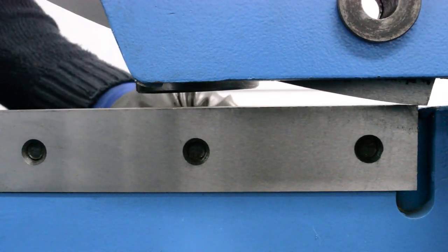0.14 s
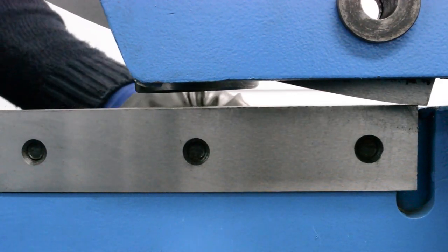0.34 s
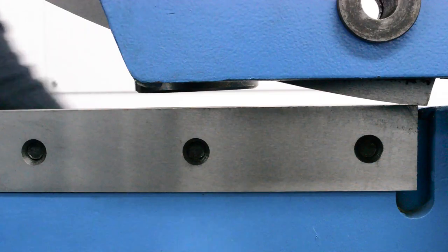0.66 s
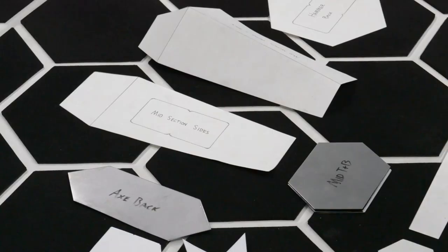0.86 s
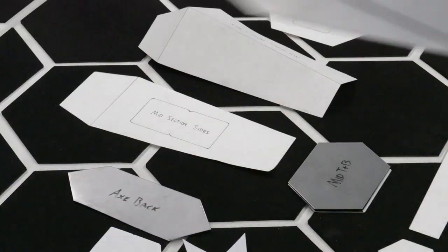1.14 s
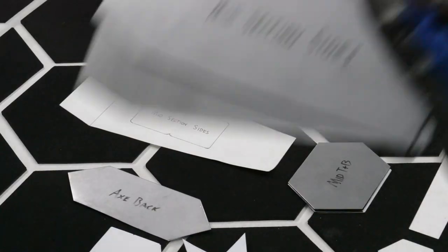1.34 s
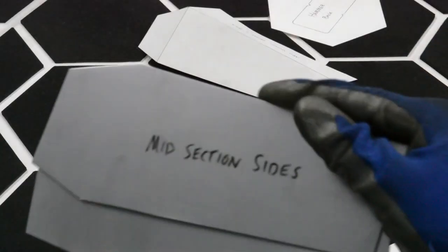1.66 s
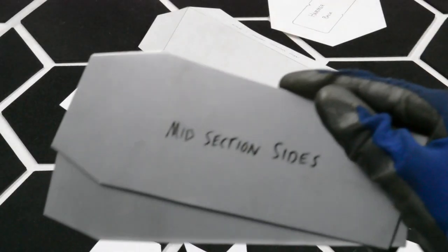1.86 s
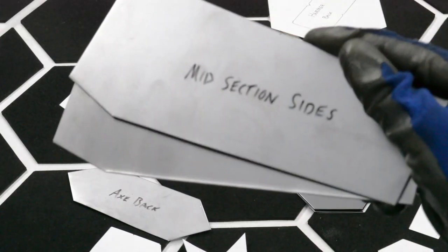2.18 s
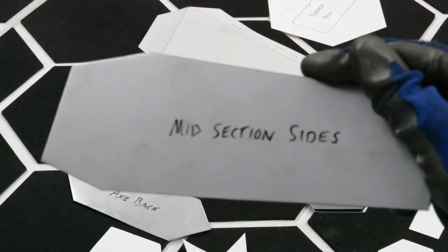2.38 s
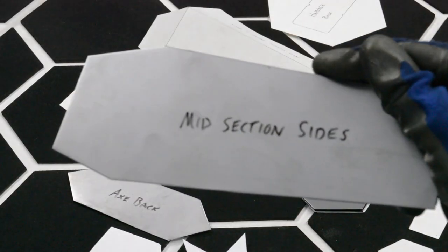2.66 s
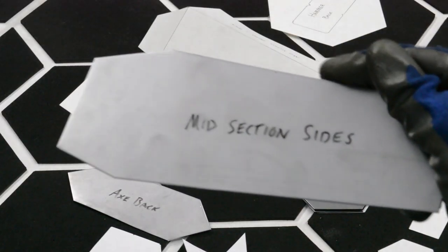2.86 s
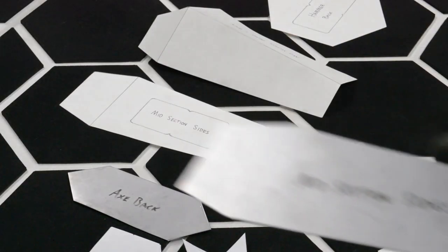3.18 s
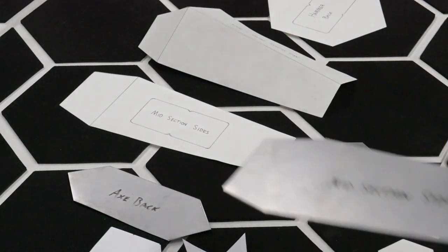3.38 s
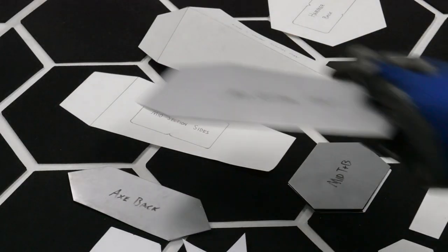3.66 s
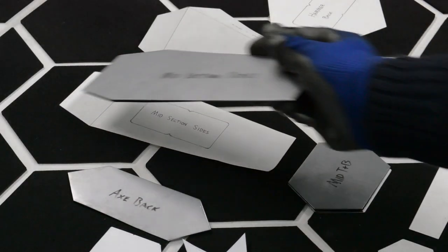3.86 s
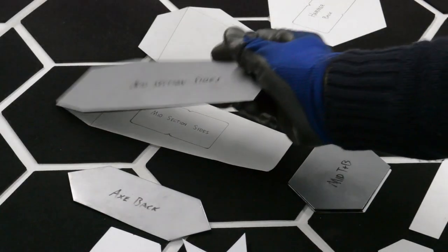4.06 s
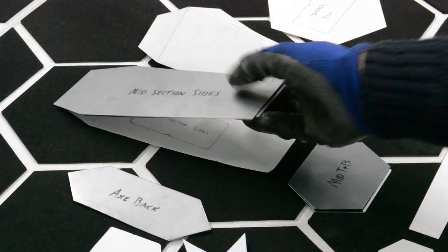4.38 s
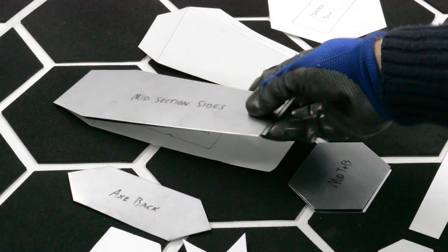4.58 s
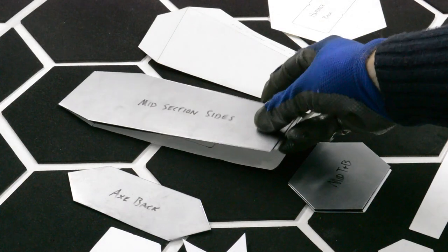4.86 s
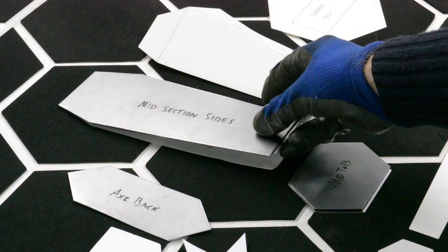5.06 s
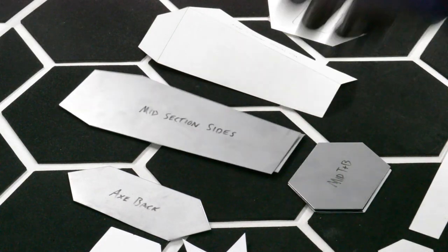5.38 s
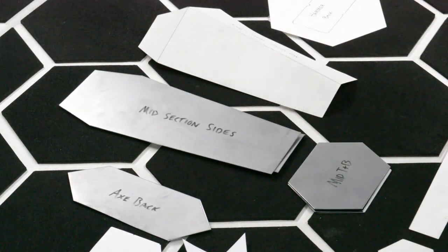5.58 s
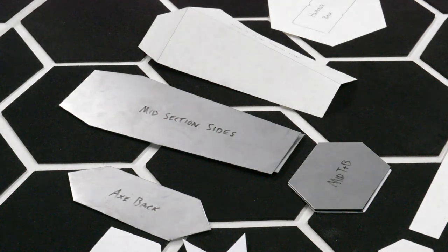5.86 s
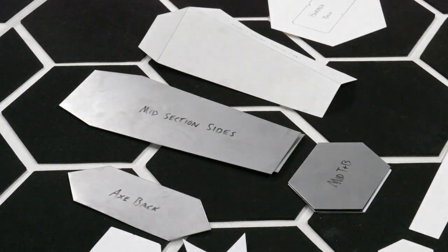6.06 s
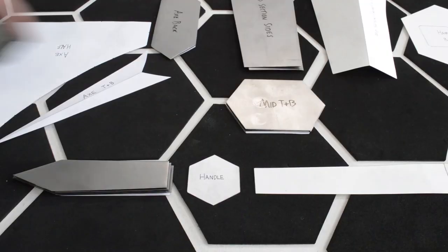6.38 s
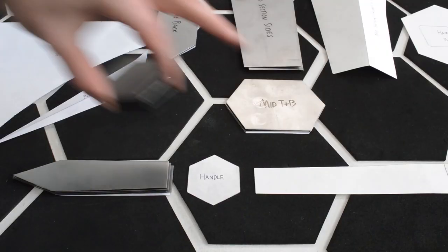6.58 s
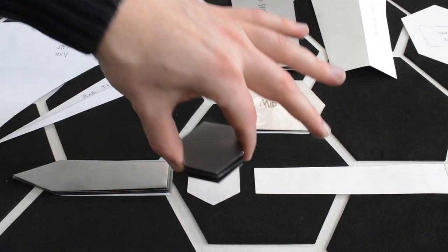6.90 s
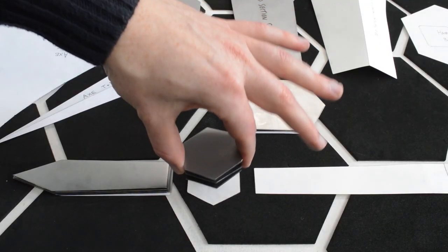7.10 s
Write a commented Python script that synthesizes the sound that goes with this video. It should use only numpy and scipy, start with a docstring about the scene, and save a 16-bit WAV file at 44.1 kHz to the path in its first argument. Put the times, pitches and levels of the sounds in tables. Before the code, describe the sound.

Workshop hush, a heavy thud with rubbing hiss and small metallic jingles, later a sharp sheet-metal swish, taps and a loud clattering drop.

```python
"""A hard-walled workshop with a steady hush, a faint hum, a high whine and a late low drone, all of
filtered noise. A bench shear settles with a thud (decaying low modes) under rubbing hiss while a small
steel offcut jingles (bending modes). Later two thin steel plates are slid on each other, tapped down on
a table and dropped in a clatter: bursts and gritty friction noise drive the plate modes. Something soft
rustles twice; a sparse-echo tail follows the near sounds."""
import sys
import numpy as np
from scipy import signal
from scipy.fft import rfft, irfft, next_fast_len
from scipy.io import wavfile
from scipy.ndimage import uniform_filter1d

SR = 44100
rng = np.random.default_rng(int(sys.argv[2]) if len(sys.argv) > 2 else 0)


def store_wav(level_fs):
    """Save 16-bit WAV to argv[1]."""
    pcm = np.round(np.clip(np.atleast_2d(level_fs), -1, 1) * 32767)
    wavfile.write(sys.argv[1], SR, pcm.T.astype(np.int16))


N = 318836


def amp(db):
    """Gain of a level in dB."""
    return 10 ** (np.asarray(db) / 20)


def evened(x):
    """Scales to rms 1."""
    return x / np.sqrt(np.mean(x ** 2) + 1e-20)


def read(points, hz):
    """Value of a spectrum table on a log-frequency axis."""
    f, value = np.transpose(points)
    return np.interp(np.log(hz + 1), np.log(f + 1), value)


def colour(x, points):
    """Filters x by a spectrum table in dB."""
    size = next_fast_len(len(x), True)
    gain = amp(read(points, np.fft.rfftfreq(size, 1 / SR)))
    return irfft(rfft(x, size) * gain, size)[:len(x)]


def add(mix, s, sound):
    """Mixes a sound in at second s."""
    part = mix[round(s * SR):][:len(sound)]
    part += sound[:len(part)]


def resonate(x, hz, width_hz):
    """Two-pole resonance of gain 1 at its centre."""
    return signal.lfilter(*signal.iirpeak(hz, hz / width_hz, SR), x)


def grit(count, spread_db, per_s):
    """Stick-slip clicks of uneven size over a bed of noise."""
    size = amp(spread_db * np.minimum(rng.exponential(1, count), 3))
    clicks = size * (rng.random(count) < per_s / SR)
    return evened(rng.standard_normal(count) * (.9 + clicks))


def hush():
    """Steady room noise, two narrow noise bands (hum and whine) and the late drone."""
    # room noise spectrum: f/Hz, relative level/dB
    room_spectrum = [(12, -38.5), (22, -12.5), (50, -2), (80, -6.5), (170, -8), (260, -7), (450, -11),
                     (900, -9), (1500, -10.5), (2500, -15.5), (5000, -19.5), (10000, -22), (11000, -23),
                     (15700, -26.5)]
    # steady bands: f/Hz, width of each of two passes/Hz, level/dB
    bands = [(783, 33, -72.5), (11960, 400, -70.5)]
    room_db, drone_db = -58.5, -65
    drone_start_s, drone_rise_s = 5.8, 0.34
    bed = amp(room_db) * evened(colour(rng.standard_normal(N), room_spectrum))
    for hz, width_hz, db in bands:
        band = resonate(resonate(rng.standard_normal(N), hz, width_hz), hz, width_hz)
        bed = bed + amp(db) * evened(band)
    drone_spectrum = [(40, -32), (70, 1), (160, 6.0), (320, -19)]  # f/Hz, relative level/dB
    drone = evened(colour(rng.standard_normal(N), drone_spectrum))
    rise = np.clip((np.arange(N) / SR - drone_start_s) / drone_rise_s, 0, 1)
    return bed + amp(drone_db) * rise * drone


def workshop(x):
    """Sparse reflections of random sign, each band dying at its own speed."""
    # decay of the hard walls: f/Hz, t60/s
    wall_t60 = [(250, 0.98), (1000, 0.98), (2500, 0.77), (5000, 0.65), (9000, 0.47), (14000, 0.31)]
    echoes = np.zeros(SR)
    at = np.arange(300, SR - 20, 10)
    echoes[at + rng.integers(0, 10, len(at))] = rng.choice([-1., 1.], len(at))
    hz, t, z = signal.stft(echoes, SR, nperseg=256)
    decay = amp(-60 * t / read(wall_t60, hz)[:, None])
    tail = signal.istft(z * decay, SR, nperseg=256)[1]
    return signal.fftconvolve(x, tail / np.linalg.norm(tail))[:N]


def rustles():
    """Cloth or paper brushed nearby: a short swell of fine crackle."""
    # soft brushes: t/s, length/s, level/dB, graininess/dB
    brushes = [(1.057, 0.22, -57, 1.5), (5.996, 0.29, -55, 4.5)]
    # crackle spectrum: f/Hz, relative level/dB
    crackle_spectrum = [(1600, -23), (2400, -4), (3000, 0), (3900, -7.5), (6200, -9.5), (7500, -36)]
    out = np.zeros(N)
    for s, length_s, db, grain_db in brushes:
        crackle = evened(colour(grit(SR // 2, grain_db, 90), crackle_spectrum))
        crackle = crackle[:round(length_s * SR)]
        add(out, s, amp(db) * crackle * signal.windows.tukey(len(crackle), .85))
    return out


def drag():
    """Hiss of gloves and sheet rubbing on the shear, and the rumble it puts into the frame."""
    # drag over the shear: t/s, hiss level/dB
    hiss_curve = [(0.0, -51.5), (0.055, -41.5), (0.128, -47.5), (0.163, -44), (0.27, -56), (0.46, -55),
                  (0.55, -57), (0.801, -61.5), (0.944, -57), (1.11, -57), (1.264, -62.5), (1.45, -66)]
    # hiss spectrum: f/Hz, relative level/dB
    hiss_spectrum = [(1060, -28), (1800, -4.5), (5340, -8.5), (6120, -4.5), (6700, -9), (7200, -10),
                     (7810, -8), (9280, -3.5), (15700, -23)]
    # frame rumble spectrum: f/Hz, relative level/dB
    rumble_spectrum = [(71, -38), (120, -5), (398, -9), (470, -11), (547, -11), (617, -8.5), (787, -5.5),
                       (4500, -18.5), (5850, -55), (9900, -120)]
    firm_hiss_db, firm_rumble_db = -48, -46.5
    rumble_db_per_hiss_db = 1.77
    s, db = np.transpose(hiss_curve)
    t = np.arange(N) / SR
    hiss_db = np.interp(t, s, db)
    hiss = amp(hiss_db) * evened(colour(grit(N, 2.8, 1500), hiss_spectrum))
    rumble_db = firm_rumble_db + rumble_db_per_hiss_db * (hiss_db - firm_hiss_db)
    rumble = amp(rumble_db) * evened(colour(rng.standard_normal(N), rumble_spectrum))
    return (hiss + rumble) * np.clip((s[-1] - t) / 0.15, 0, 1)


def thuds():
    """Dull blows on frame and table: a noisy push with the heavy low modes; the lowest has its own share."""
    # blows: t/s, level/dB, lowest mode/dB, push noise/dB
    blows = [(0.045, -23, -19, -1.5), (0.063, -35.5, 7, -12), (0.146, -40, 1, 14.5), (0.829, -39.5, -28, 7),
             (0.87, -42.5, -28, 5), (4.124, -52.5, -25, 9), (4.504, -45.5, -21.5, 3),
             (5.26, -35.5, -4.5, 5), (5.325, -36.5, -23.5, 4), (5.388, -48, -23, 1.5)]
    # modes of frame and table: f/Hz, level/dB, t60/s
    bench_modes = [(80.7, 8, 0.16), (131, -3.5, 0.097), (187, -9, 0.079), (300.4, -3.5, .12),
                   (381, 6.5, 0.1), (515.6, 0, 0.32), (790, -6.5, 0.085), (1118, -9, 0.13)]
    # push noise spectrum: f/Hz, relative level/dB
    push_spectrum = [(70, -23.5), (170, -1), (500, 0.5), (1200, -7.5), (2200, -29.5)]
    out, t = np.zeros(N), np.arange(SR // 2) / SR
    onset = 1 - np.exp(-t / 0.0082)
    phases = rng.random((len(blows), len(bench_modes)))
    for (s, db, boom_db, noise_db), turns in zip(blows, phases):
        modes = [amp(mode_db - 60 * t / t60) * np.sin(2 * np.pi * (hz * t + turn))
                 for (hz, mode_db, t60), turn in zip(bench_modes, turns)]
        push = evened(colour(rng.standard_normal(len(t)), push_spectrum)) * np.exp(-t / 0.024)
        blow = amp(boom_db) * modes[0] + sum(modes[1:]) + amp(noise_db) * push
        add(out, s, amp(db - 11) * blow * onset)
    return out


def jingles():
    """Knocks ring the offcut: place and hardness weight the modes, loose contact makes them flutter."""
    # knocks: t/s, level/dB, place along the strip/0-1, hardness/dB per octave
    knocks = [(.1397, -55, .245, 4), (.1688, -57, .245, 6), (.2054, -61, .443, 4), (.2683, -57, .04, -8),
              (.3294, -62, .007, 0), (.379, -61, .473, -4), (.4101, -59, .49, -6), (.46, -54, .034, -6),
              (.5396, -65, .154, -2), (.5944, -54, .208, -5), (.612, -56, .225, -6), (.74, -68, .443, 2),
              (.9065, -60, .027, -2), (1.059, -69, .248, 4), (1.1944, -64, .43, -6)]
    # offcut modes: f/Hz, level/dB, t60/s
    offcut_modes = [(3510, -1, .15), (4651, -0.5, 0.28), (5970, 10, 0.13), (7380, 9, 0.38),
                    (8290, -1, 0.27), (9022, 7.5, 0.26), (10900, 2.5, 0.35), (12600, -6, .25),
                    (12930, 2, .2), (14600, -10, .3), (15040, -8, .4)]
    strip_hz = 82  # a mode of n half waves lies at n squared times this
    tilt_centre_hz = 7000
    at_node = 0.14  # what a knock on a node still stirs
    free_s = 0.063  # every ring is free this long, then fades fast
    out, t = np.zeros(N), np.arange(SR // 6) / SR
    hz, mode_db, t60 = np.transpose(offcut_modes)[..., None]
    half_waves = np.sqrt(hz / strip_hz)
    shape = (1 - np.exp(-t / 0.0028)) * np.exp(-np.maximum(t - free_s, 0) / 0.011)
    phases = rng.random((len(knocks), len(offcut_modes), 1))
    for (s, db, place, hard_db), turns in zip(knocks, phases):
        slow_noise = uniform_filter1d(rng.standard_normal((len(offcut_modes), len(t))), 350)
        flutter = 1 + 0.91 * evened(slow_noise)
        stirred = at_node + abs(np.sin(np.pi * (half_waves * place - 1 / 4)))
        tilt_db = hard_db * np.log2(hz / tilt_centre_hz)
        ring = amp(db + mode_db + tilt_db - 60 * t / t60) * np.sin(2 * np.pi * (hz * t + turns))
        add(out, s, (stirred * flutter * ring).sum(axis=0) * shape)
    return out


def squeaks():
    """Slips of an edge, and at 4.464 s the ring of a tap: short fuzzy whistles, noise in a high resonance."""
    # whistles: t/s, length/s, f/Hz, level/dB
    whistles = [(4.303, 0.036, 10000, -51.5), (4.464, 0.0086, 10400, -38), (4.671, 0.029, 10300, -61),
                (4.753, 0.063, 9700, -60.5), (4.883, 0.031, 7000, -61)]
    out = np.zeros(N)
    for (s, length_s, hz, db), noise in zip(whistles, rng.standard_normal((len(whistles), SR // 8))):
        whistle = evened(resonate(resonate(noise, hz, 800), hz, 800))[:round(length_s * SR)]
        add(out, s, amp(db) * whistle * signal.windows.tukey(len(whistle), .6))
    return out


def strokes():
    """Friction noise swells to its hardest moment and eases; the grip sets its body and edge."""
    # slides and chatter: start/s, hardest/s, end/s, level/dB, body/dB, edge/dB; end before start is silent
    slides = [(3.968, 4.02, 4.18, -60.5, 0.5, -18.5), (4.26, 4.304, 4.4, -55, -6.5, -18),
              (4.446, 4.484, 4.505, -45, -4, -20), (4.497, 4.513, 4.59, -48, -1.5, -18),
              (4.62, 4.687, 4.74, -59, -2, -17), (4.71, 4.79, 4.87, -60.5, 0, -21),
              (4.85, 4.893, 4.9, -61, -7, -17), (5.136, 5.2, 5.8, -54.5, -0.5, -21),
              (5.242, 5.263, 5.32, -38, -2, -20), (5.312, 5.335, 5.003, 9.5, -7, -21),
              (5.36, 5.372, 5.55, -29.5, -5, -27)]
    # one swipe of the held plates: t/s, level/dB, body/dB, edge/dB
    swipe = [(2.255, -63, -11, -24), (2.28, -48.5, -4.5, -26), (2.306, -30, -4, -22),
             (2.318, -27.5, -10.5, -18), (2.342, -19.5, -12.5, -15), (2.36, -23, -10.5, -12),
             (2.385, -38, -8, -12)]
    # main friction band: f/Hz, relative level/dB
    bite_spectrum = [(4000, -40), (6000, 0.5), (8000, 0.5), (10000, -1), (11500, -6.5), (13500, -29)]
    # bending sheet: f/Hz, relative level/dB
    body_spectrum = [(500, -36), (900, -13), (1600, -9.5), (2800, -1), (4500, -1.5), (6500, -24)]
    # bright edge: f/Hz, relative level/dB
    edge_spectrum = [(11000, -38.5), (12500, 4), (15700, -8.5)]
    start_db, end_db = -34, -15.5  # relative to the hardest moment
    swell_power, ease_power = 1.3, 1.3
    noise, out, t = grit(N, 2.1, 4000), np.zeros(N), np.arange(N) / SR
    bite = evened(colour(noise, bite_spectrum))
    body = evened(colour(noise, body_spectrum))
    edge = evened(colour(noise, edge_spectrum))

    def rub(start, end, db, body_db, edge_db):
        """Mixes the three friction bands between faded ends."""
        ends = np.clip((t - start) / 0.0086, 0, 1) * np.clip((end - t) / 0.036, 0, 1)
        return amp(db) * ends * (bite + amp(body_db) * body + amp(edge_db) * edge)

    for start, hard, end, db, body_db, edge_db in slides:
        swell_db = start_db * np.clip((hard - t) / (hard - start), 0, 1) ** swell_power
        ease_db = end_db * np.clip((t - hard) / (end - hard), 0, 1) ** ease_power
        out += rub(start, end, db + (swell_db + ease_db), body_db, edge_db)
    s, *columns = np.transpose(swipe)
    return out + rub(s[0], s[-1], *(np.interp(t, s, c) for c in columns))


def taps():
    """Each strike is a sharp burst around the pitch of the struck edge; then the sheet shivers on."""
    # edge strikes: t/s, level/dB, body/dB (more in a flat landing), edge f/Hz, brightness/dB, shiver/dB
    strikes = [(1.6377, -43, -8, 6950, -4, -12), (2.9806, -37, 2, 10300, -18, -22),
               (4.1238, -12, -21, 10600, -17, -20), (4.1303, -19, -3, 9840, -20, -10),
               (4.169, -17, -12, 10000, -16, -15.5), (4.2036, -34, 4, 9700, -19, -2),
               (4.448, -27.5, -6, 10540, -14, -11.5), (4.4646, -26.5, -27.5, 10450, -16, -22.5),
               (4.474, -19, -29.5, 10600, -20, -19), (4.5029, -25, 2, 10100, -20, -10),
               (4.5105, -19, -11, 10200, -18, -13.5), (4.5146, -15.5, -8, 9500, -18, -20),
               (4.5241, -23.5, 6.5, 8790, -23, -10.5), (4.8025, -33, -9, 9640, -23, -15),
               (5.1489, -28.5, -8, 7250, -27, -6), (5.1875, -24, -12, 8600, -19, -11),
               (5.226, -24.5, -27.5, 8900, -24, -9.5), (5.255, -26.5, -9.5, 9130, -24.5, -13),
               (5.2618, -14, -11, 8040, -16, -21.5), (5.269, -8, -15.5, 10600, -20.5, -17.5),
               (5.3061, -9, -7, 9970, -22, -9.5), (5.3246, -0.5, -16.5, 9800, -24, -7.5),
               (5.3317, -5, -19, 10700, -25, -17), (5.337, 3, -13, 8370, -27.5, -10),
               (5.339, -1, -18, 9600, -24, -16.5), (5.341, -7.5, -21, 7000, -28, -18.5),
               (5.352, -2, -25, 9330, -26, -22), (5.3583, -14, 0, 10400, -24.5, -19),
               (5.372, -14, -6, 9400, -22, -16.5), (5.378, -5.5, -7.5, 10040, -19, -15.5),
               (5.389, -2, -22.5, 10300, -25, -16.5), (5.3924, -6.5, -12.5, 9900, -30, -15),
               (5.4328, -6.5, -13, 8100, -17, -19), (5.452, -17, -2, 9350, -31, -18),
               (5.4871, -19.5, -2, 8870, -32, -12)]
    table_db = -2.5  # the table under the body
    out, t = np.zeros(N), np.arange(-256, 3840) / SR
    onset = np.clip(t / 0.00053, 0, 1)
    noises = rng.standard_normal((len(strikes), len(t)))
    for (s, db, body_db, hz, top_db, shiver_db), noise in zip(strikes, noises):
        below, above = np.clip(hz * np.array([6, 8]) / 7, 5900, 13500)
        low = [(150, body_db + table_db - 11.5), (1000, body_db + table_db), (3500, body_db + 6.0)]
        high = [(5600, -5), (below, -3.5), (hz, 1.5), (above, -3.5), (13800, top_db)]
        fall = (np.exp(-t / 0.0019) + amp(shiver_db) * np.exp(-t / 0.025)) * onset
        burst = evened(colour(noise, low + high))
        add(out, s + t[0], amp(db - 10.5) * burst * fall)
    return out


def plates(drive):
    """The contact sound plus the ring of the sheets, whose modes change once they are laid down."""
    # modes held in the air: f/Hz, width/Hz, level/dB
    held_modes = [(2400, 54, -11), (2860, 46, -11), (3330, 35, 1), (3990, 88, -9), (4470, 52, 1),
                  (5040, 160, 3.5), (5300, 99, -0.5), (5600, 22, -18), (5980, 24.8, -23), (6440, 34, -15),
                  (6640, 120, -12), (7020, 24, -11), (7100, 28, 2), (7700, 67, -5.5), (7640, 49, -8),
                  (8540, 220, 1), (9030, 283, -14), (9050, 162, -4), (9600, 87, 7), (10000, 87, -2),
                  (10700, 240, -4), (11500, 80, 1.5)]
    # modes lying on the table: f/Hz, width/Hz, level/dB
    laid_modes = [(1155, 110, -18), (1760, 28, -6), (2300, 12, -5), (3074, 38, -17), (3323, 40, -11),
                  (3820, 41, -16), (4712, 64, -6), (5350, 110, -8), (5980, 83, -11), (6450, 100, -3.5),
                  (7000, 39, -15), (7060, 54.85, -6), (7790, 30, -20.5), (8430, 99, -1.5), (9240, 200, -4),
                  (10040, 170, -2)]
    # how readily modes take up the contact: f/Hz, gain/dB
    uptake = [(2000, 8.5), (5000, 7.5), (9000, -2.5)]
    laid_s = 3.5
    held, laid = np.split(colour(drive, uptake), [round(laid_s * SR)])

    def ring(part, modes):
        """Sums the parallel mode resonances."""
        return sum(amp(db) * resonate(part, hz, width_hz) for hz, width_hz, db in modes)

    return drive + amp(1.5) * np.concatenate([ring(held, held_modes), ring(laid, laid_modes)])


def scene():
    """Near sounds, their echo in the workshop, the colour of the microphone, and the hush."""
    # port peak of the microphone: f/Hz, gain/dB
    port_peak = [(7000, -1), (8800, -0.1), (10100, 1.5), (11300, 1.5), (12500, 1), (15700, -4)]
    sheets = plates(taps() + strokes()) + squeaks()
    shear = drag() + jingles() + thuds() + rustles()
    echo = workshop(amp(-7.0) * sheets + amp(-9) * shear)
    near = sheets + shear + echo
    return (colour(near, port_peak) + hush())[None]


def record(dry):
    """The input stage rounds off the highest peaks; then the band limit."""
    ceiling, band_limit_hz = .9, 15800
    rounded = ceiling * np.tanh(dry / ceiling)
    lowpass = signal.firwin(1023, band_limit_hz, window=("kaiser", 9), fs=SR)
    return signal.oaconvolve(rounded, lowpass[None], "same")


dry = scene()
out = record(dry)
store_wav(out)
```